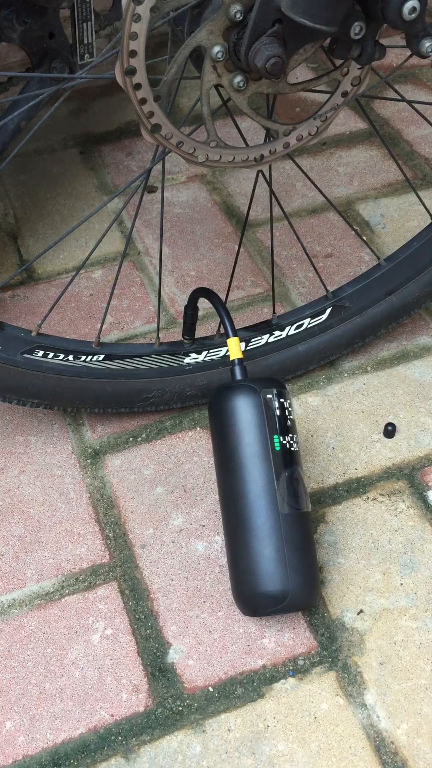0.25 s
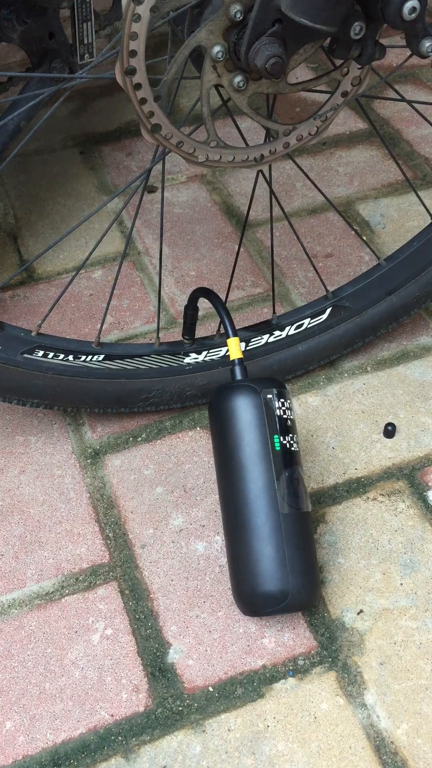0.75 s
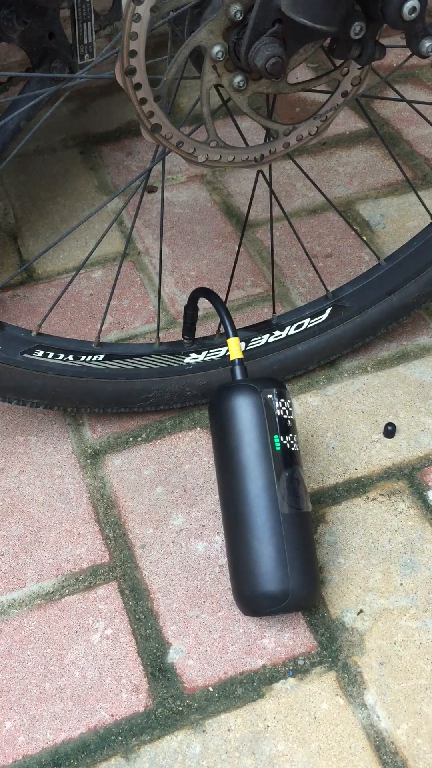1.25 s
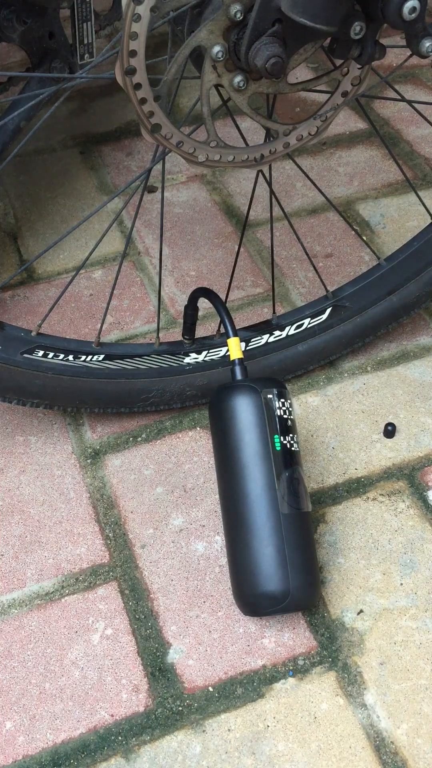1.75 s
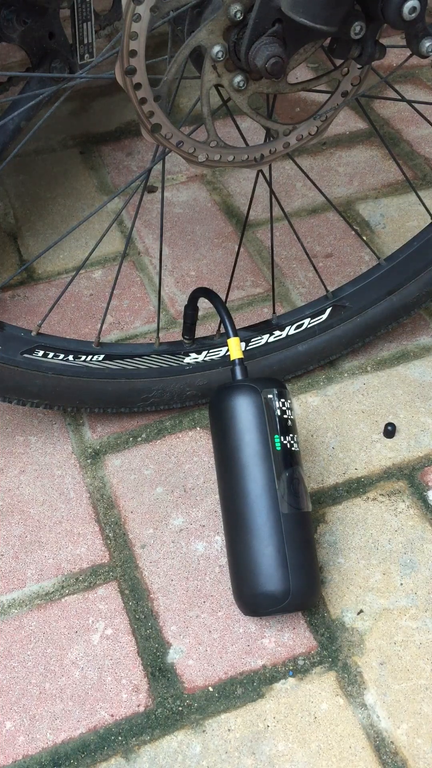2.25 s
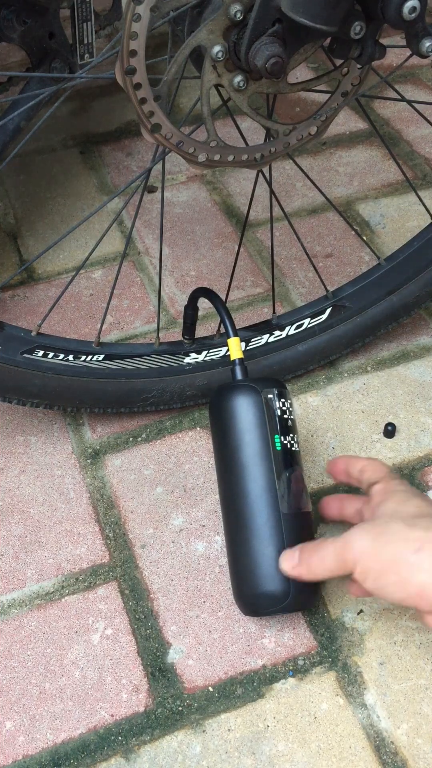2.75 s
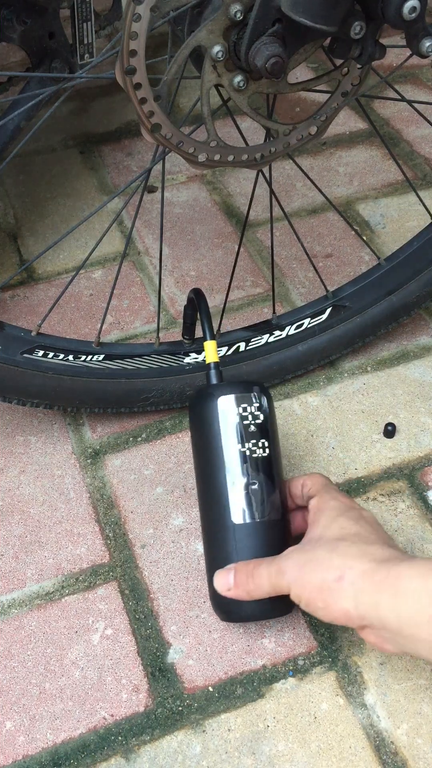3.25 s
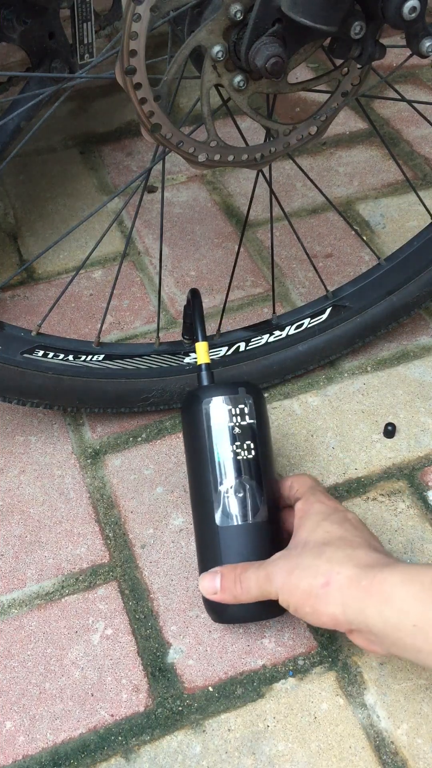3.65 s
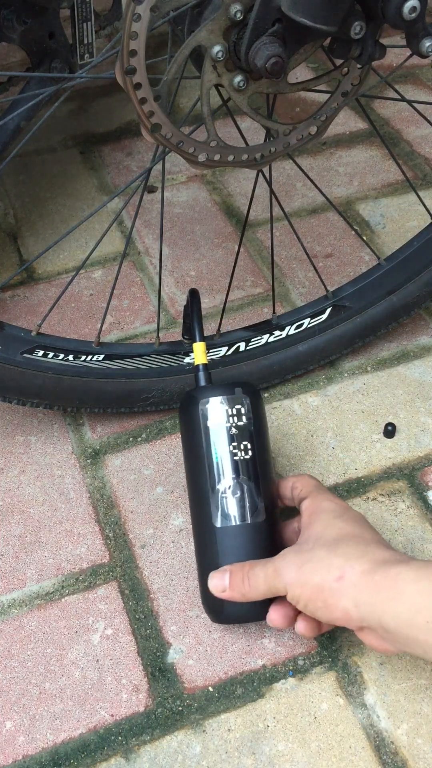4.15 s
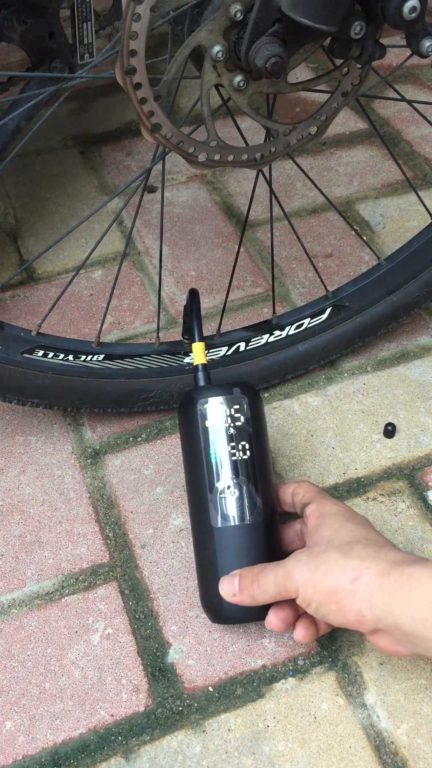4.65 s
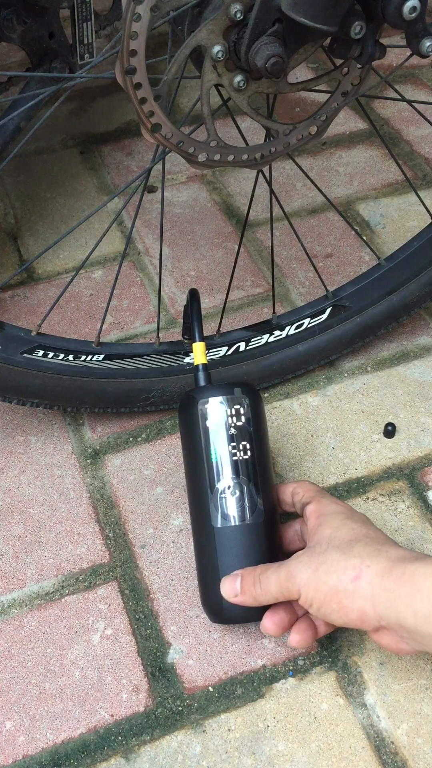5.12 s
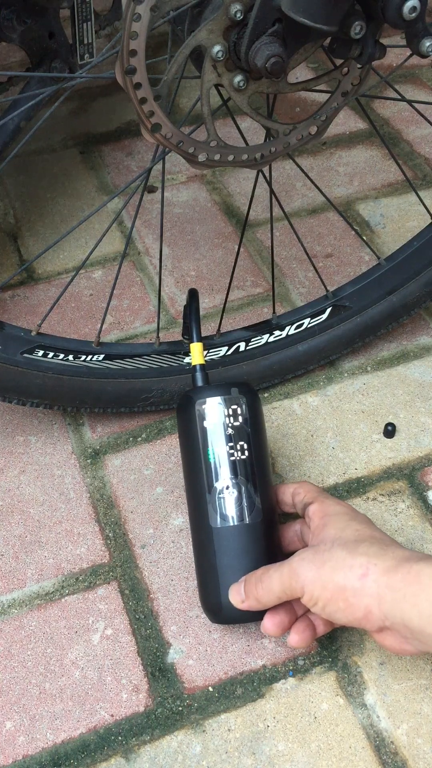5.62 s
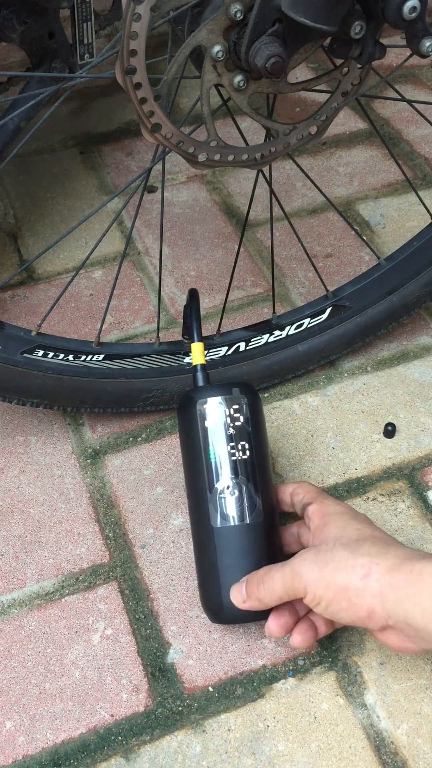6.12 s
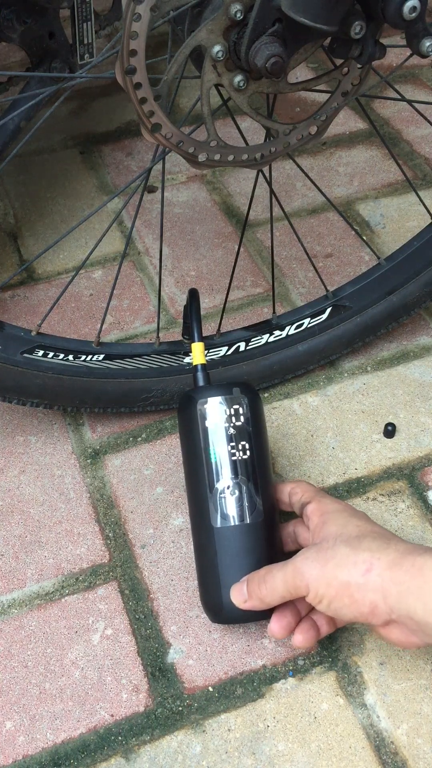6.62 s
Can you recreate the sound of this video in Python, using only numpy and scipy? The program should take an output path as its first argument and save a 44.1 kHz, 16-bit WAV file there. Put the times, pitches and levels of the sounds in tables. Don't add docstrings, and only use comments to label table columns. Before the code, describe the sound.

From 0 s a small battery-powered air compressor is already running, close and dry, lying on bricks outdoors. Its piston and valves knock the plastic case about 56 times a second, fusing into a harsh, rattling buzz with midrange ring, whining loaded gears and gritty, pulsing air hiss. The tone wavers gently about twice a second as motor and crank drift in and out of step. The speed sags very slightly and evenly throughout. At about 3.0-3.5 s a hand takes hold: a slightly harder rattle, then from 3.3 s a faint, hollow, stuttering low scrape on brick that dips in pitch and fades within about a second. From then to the end, near 7 s, the held case has some resonances damped and others brought forward, with a stronger narrow whine near 2.4 kHz. Faint outdoor air, distant traffic and a weak low hum lie beneath. The pump never stops.

```python
import sys
import numpy as np
from scipy import signal
from scipy.fft import rfft, irfft
from scipy.io import wavfile
from scipy.ndimage import uniform_filter1d

SR = 44100
rng = np.random.default_rng(int(sys.argv[2]) if len(sys.argv) > 2 else 0)


def unload_wav(signal):
    wavfile.write(
        sys.argv[1],
        SR,
        np.round(np.clip(np.atleast_2d(signal).T, -1, 1) * 32767).astype(np.int16),
    )


def invert_db(level):
    return 10 ** (np.asarray(level, dtype=float) / 20)


N = 303408
T = np.arange(N) / SR
TEETH = 35


def knocks(turns, grip, jitter_turns=0.0003, uneven_db=-0.25):
    # angle/turn, thud free/dB, thud held/dB, tick free/dB, tick held/dB
    pulls = [(0.12, -6, -6.5, -6.5, -13), (0.471, -6, -18, -4, -6), (0.585, -3, 0, 3, -0.5),
             (.765, 4, 0.5, 3.5, -1.5), (0.926, -7, 1.5, -34, -22)]
    # angle/turn, thud free/dB, thud held/dB, tick free/dB, tick held/dB
    pushes = [(0.329, -32, -48, -13, -15), (0.512, -12.5, -16.5, -5.5, -3), (0.618, -32, -58, -42, -24.5),
              (0.718, -2, -0.5, -10.5, -20), (0.811, -2.5, -4.5, -2.5, -9.5)]
    # f/Hz, width/Hz, free level/dB, held level/dB
    thud_modes = [(624, 31, -4, -38), (604, 380, -0.5, 0), (886, 105, -13, -5), (1051, 47, 2.5, -7),
                  (723, 14, -39, -6.5), (1244, 53, -11, -25), (1317, 71, 3, -5), (1428, 13, 5, -18)]
    # f/Hz, width/Hz, free level/dB, held level/dB
    tick_modes = [(2370, 48, 7, -39), (2370, 50, -1, -32), (2570, 43, 9.5, 9), (2803, 184, -1, 5),
                  (3017, 85, -9.5, -1.5), (3252, 112, 1, 4), (3410, 130, -9.5, -9.5), (3707, 89, 4.5, 2),
                  (4060, 52, -19, -7), (4144, 110, -5, -4), (4560, 58, -25, -4.5), (5010, 250, -4.5, -8.5),
                  (5355, 93, -5.5, -9.5), (6100, 230, -36, -3), (6910, 157, -16, 2), (7300, 100, -33, -30),
                  (7960, 130, -10, -6), (8390, 240, -23.5, -15), (9250, 130, -22, -13),
                  (9400, 150, -31, -24), (10100, 120, -20, -15)]
    angle, thud_free, thud_held, tick_free, tick_held = np.transpose(pulls + pushes)
    sign = np.repeat([-1, 1], [len(pulls), len(pushes)])
    luck = drifting(turns, 2 * len(angle)).reshape(-1, len(angle), 2)
    places = np.arange(len(luck))[:, None] + angle + jitter_turns * luck[..., 0]
    held = np.interp(places, turns, grip)
    size = sign * invert_db(uneven_db * luck[..., 1])
    thud_size = size * invert_db(thud_free + held * (thud_held - thud_free))
    tick_size = size * invert_db(tick_free + held * (tick_held - tick_free))
    thuds = clicks(places.ravel(), turns, thud_size.ravel())
    ticks = clicks(places.ravel(), turns, tick_size.ravel())
    thud_ring = invert_db(-29.0) * case(thuds, thud_modes, grip, floor_hz=583)
    tick_ring = invert_db(-33.5) * case(ticks, tick_modes, grip, floor_hz=2320)
    return thud_ring + tick_ring


def gears(turns, grip, slip, uneven_db=1.2):
    # angle/turn, spread/turn, level/dB
    load = [
        (.46, 0.072, 0.5),
        (.61, 0.056, 10.5),
        (.81, 0.014, 9.5),
        (.98, 0.027, 2),
    ]
    # f/Hz, width/Hz, free level/dB, held level/dB
    whine_modes = [(1687, 18, 12, 4), (1773, 79, 9.5, -7.5), (1807, 940, 2, 5), (2180, 41, -31, -36),
                   (2352, 15.7, 10, 17.5)]
    head_start = [0.32, 0.31]
    teeth = np.arange(int(turns[-1] * TEETH))
    mesh = clicks(teeth / TEETH, turns, invert_db(uneven_db * rng.standard_normal(len(teeth))))
    creep_turns = turns * (TEETH + 1) + slip + 0.081
    creep = clicks(teeth, creep_turns, invert_db(uneven_db * rng.standard_normal(len(teeth))))
    creep_db = -14.5 + 3 * grip
    drive = round_turn(load, turns) * (mesh + invert_db(creep_db) * creep)
    tone_16 = np.sin(2 * np.pi * (16 * turns - slip + head_start[0]))
    tone_17 = np.sin(2 * np.pi * (17 * turns - slip + head_start[1]))
    motor = invert_db(-46.5) * (tone_16 + .6 * grip * tone_17)
    whine = case(drive, whine_modes, grip, floor_hz=1722, top_hz=3450)
    return invert_db(-27.5 + 1.13 * grip) * whine + motor


def pin(turns, grip, slip, fade_db=13.0):
    # f/Hz, width/Hz, free level/dB, held level/dB
    pin_modes = [(2277, 81, 14.5, 8), (880, 63, -21, -10)]
    luck = drifting(turns, count=2)
    places = np.arange(len(luck)) + .73 + 0.00041 * luck[:, 0]
    since_step = (slip + .3) % 1
    slack = (1 - .6 * grip) * (1 - hump(since_step, .3, .12))
    jolt_db = 7 * hump(T, 3.27, 0.25)
    force_db = 6 + jolt_db - fade_db * slack
    size = invert_db(np.interp(places, turns, force_db) + 2.0 * luck[:, 1])
    push = signal.windows.hann(61) * np.sin(2 * np.pi * 2250 * np.arange(61) / SR + 2.72)
    slaps = np.convolve(clicks(places, turns, size), push)[:N]
    return invert_db(-38.0) * case(slaps, pin_modes, grip, floor_hz=690, top_hz=2360)


def air(turns, grip, slip, grit_db=-0.5):
    # angle/turn, spread/turn, level/dB
    rattling = [(.25, 0.086, -0.5), (.42, 0.031, -3.5), (.7, 0.057, 5.5), (.97, 0.14, 4)]
    # angle/turn, spread/turn, level/dB
    hissing = [(.2, .2, -8), (.5, 0.12, -5.5), (.7, 0.029, -2.5), (.88, 0.069, -0.5)]
    # f/Hz, width/Hz, free level/dB, held level/dB
    rattle_modes = [(657, 290, -11.5, -13.5), (874, 400, -8.5, -8.5), (971, 130, -12, -4.5),
                    (1210, 106, -16, -11.5), (1413, 223, -6.5, -6.5), (2000, 380, -8, -4),
                    (2263, 186, 1.5, 2.5)]
    # f/Hz, width/Hz, free level/dB, held level/dB
    hiss_modes = [(2800, 670, 3.5, 1.5), (3284, 140, -1, -1), (4030, 230, 6, -4.5), (4540, 2060, 2, -0.5),
                  (5580, 570, 3, -4.5), (5740, 110, -11, 3.5), (6760, 460, -7, -3), (6600, 240, 3, -20),
                  (6940, 510, 0, -0.5), (7420, 190, -4.5, -12), (8080, 810, -0.5, 0.5), (8620, 360, 0, 2),
                  (8810, 240, -3, -1), (9060, 180, 1.5, -12), (9660, 2600, -2.5, -5.5),
                  (10580, 160, -19, -2), (11400, 540, -4, -3.5), (12500, 1100, -5, -5),
                  (14100, 400, -8, -9), (14700, 1300, -2, -2)]
    swell_db = 0.36 * np.cos(2 * np.pi * (slip - .15))
    rough = evened(uniform_filter1d(rng.standard_normal(N), size=24))
    grit = invert_db(grit_db * rough + 0.77 * np.cos(2 * np.pi * TEETH * turns))
    shaken = round_turn(rattling, turns) * invert_db(swell_db)
    blown = round_turn(hissing, turns) * invert_db(1.6 * swell_db) * grit
    rattle = case(shaken, rattle_modes, grip, floor_hz=544, top_hz=2380, loose=True, repeat=0.48)
    hiss = case(blown, hiss_modes, grip, floor_hz=1900, loose=True, repeat=0.49)
    return invert_db(-31.0) * rattle + invert_db(-33.5 + 0.3 * grip) * hiss


def shake(turns, grip):
    # multiple of crank speed, free level/dB, held level/dB
    orders = [(1, -51.5, -52), (2, -42.5, -42), (3, -60, -56.5), (4, -41.5, -41.5), (5, -47, -48),
              (6, -49, -44.5), (7, -45.5, -47.5), (8, -47, -48), (9, -42.5, -41), (10, -56.5, -40),
              (16, -53, -37.5)]
    shove, lean, body_lag, even_lag = .91, .006, .25, .13
    rocking = 0
    for k, free_db, held_db in orders:
        phase = k * (turns - shove) + lean * k ** 2 - body_lag - even_lag * (1 - k % 2)
        rocking = rocking - invert_db(free_db + grip * (held_db - free_db)) * np.cos(2 * np.pi * phase)
    return rocking


def scrape():
    start_s, rise_s, level_db, fade_db_per_s = 3.29, 0.043, -44, 21
    since = np.maximum(T - start_s, 0)
    gain = np.minimum(since / rise_s, 1) * invert_db(level_db - fade_db_per_s * since)
    hz = 435 - 85 * hump(T, 3.46, 0.048)
    stutter = invert_db(1.5 * evened(uniform_filter1d(rng.standard_normal(N), size=900)))
    friction = stutter * rng.standard_normal(N)
    return gain * evened(resonate(resonate(friction, hz, 140), hz, 140))


def yard():
    # f/Hz, level per Hz/dB
    spectrum = [(25, -40), (45, -12), (75, -4), (100, -11), (135, -5), (200, -7), (300, -7.5), (480, -10.5),
                (1000, -13.5), (4000, -13), (16000, -31)]
    hz, db = np.transpose(spectrum)
    colour = invert_db(np.interp(np.log(np.fft.rfftfreq(N, 1 / SR) + 1), np.log(hz), db))
    wash = evened(irfft(rfft(rng.standard_normal(N)) * colour, N))
    hum = evened(mode(rng.standard_normal(N), 98.8, 2.5))
    return invert_db(-49.0) * wash + invert_db(-56.5) * hum


def crank():
    start_turn, start_rpm, sag_rpm_per_s = -.0154, 3398.05, 9.893
    return start_turn + (start_rpm * T - sag_rpm_per_s * T ** 2 / 2) / 60


def case(x, modes, grip, floor_hz, top_hz=19000, loose=False, repeat=0):
    ring = 0
    for hz, width, free_db, held_db in modes:
        if loose:
            first_stage = mode(x * shiver(repeat), hz, 1.3 * width)
            part = mode(first_stage, hz, 1.3 * width)
        else:
            part = mode(x, hz, width)
        ring = ring + invert_db(free_db + grip * (held_db - free_db)) * part
    radiated_band = signal.butter(4, [floor_hz, top_hz], "band", fs=SR, output="sos")
    return evened(signal.sosfiltfilt(radiated_band, ring))


def mode(x, hz, width):
    r = np.exp(-np.pi * width / SR)
    return 2 * signal.lfilter([1 - r], [1, -r * np.exp(2j * np.pi * hz / SR)], x).imag


def resonate(x, hz, width):
    turn = np.exp(2j * np.pi * np.cumsum(hz + 0 * T) / SR)
    r = np.exp(-np.pi * width / SR)
    return 2 * (turn * signal.lfilter([1 - r], [1, -r], x / turn)).imag


def shiver(repeat):
    turn_samples = 787
    place = ((crank() + 1) * turn_samples).astype(int)
    fresh = rng.standard_normal((place[-1] // turn_samples + 1, turn_samples))
    carried = signal.lfilter([1], [1, -repeat], fresh, axis=0)
    return np.sqrt(1 - repeat ** 2) * carried.ravel()[place]


def drifting(turns, count, memory=7, fresh=0.85):
    luck = rng.standard_normal((int(turns[-1]) + 1, count, 2))
    carried = evened(uniform_filter1d(luck[..., 1], size=memory, axis=0))
    return fresh * luck[..., 0] + (1 - fresh) * carried


def clicks(places, turns, sizes):
    at = np.interp(places, turns, np.arange(N), left=N, right=N)
    whole = at.astype(int)
    part = at - whole
    early = np.bincount(whole, sizes * (1 - part), N + 2)
    late = np.bincount(whole + 1, sizes * part, N + 2)
    return (early + late)[:N]


def round_turn(swells, turns):
    return sum(invert_db(db) * hump((turns - angle + .5) % 1, 0.4954, spread) for angle, spread, db in swells)


def hump(x, centre, spread):
    return np.exp(-.5 * ((x - centre) / spread) ** 2)


def evened(x):
    return x / np.sqrt(np.mean(x ** 2) + 1e-20)


def scene():
    turns = crank()
    loose_grip, grab_s, close_s = 0.072, 3.2, 0.14
    closing = 1 / (1 + np.exp((grab_s - T) / close_s))
    grip = np.clip(loose_grip + (1 - loose_grip) * closing, 0, 1)
    slip = .37 + 1.8226 * T + .0343 * T ** 2 / 2
    pump = knocks(turns, grip) + gears(turns, grip, slip) + pin(turns, grip, slip)
    pump = pump + air(turns, grip, slip) + shake(turns, grip)
    return (pump + scrape() + yard())[None]


def roll_off(x):
    return signal.sosfilt(signal.butter(12, 16720, fs=SR, output="sos"), x)


def record(dry):
    low_pass = signal.firwin(1023, 15720, window=("kaiser", 7), fs=SR)
    limited = signal.oaconvolve(dry, low_pass[None], "same")
    return roll_off(limited)


dry = scene()
out = record(dry)
unload_wav(out)
```